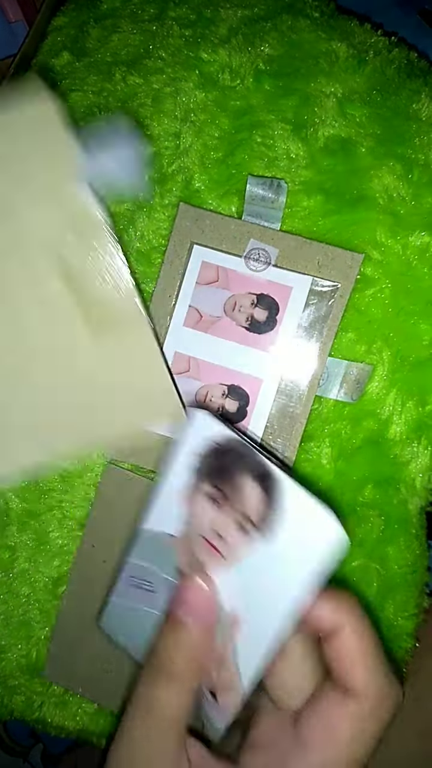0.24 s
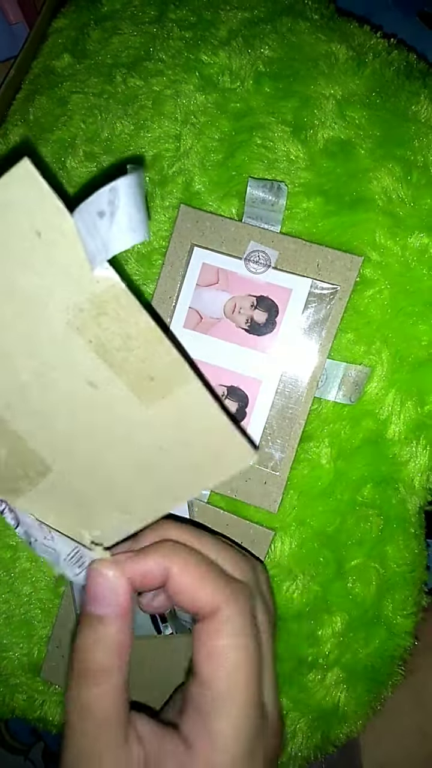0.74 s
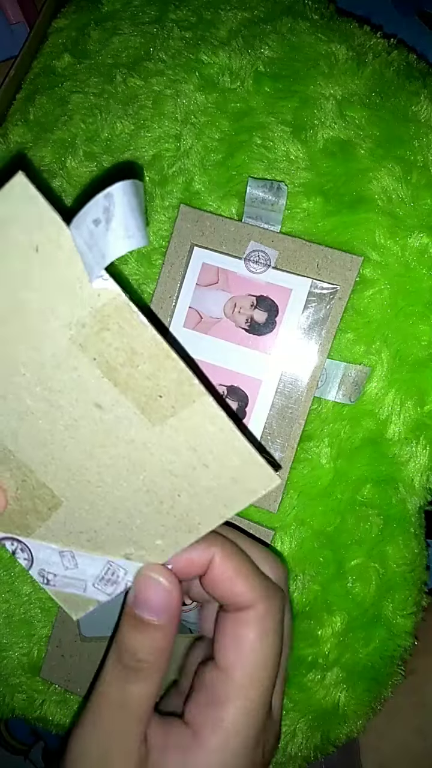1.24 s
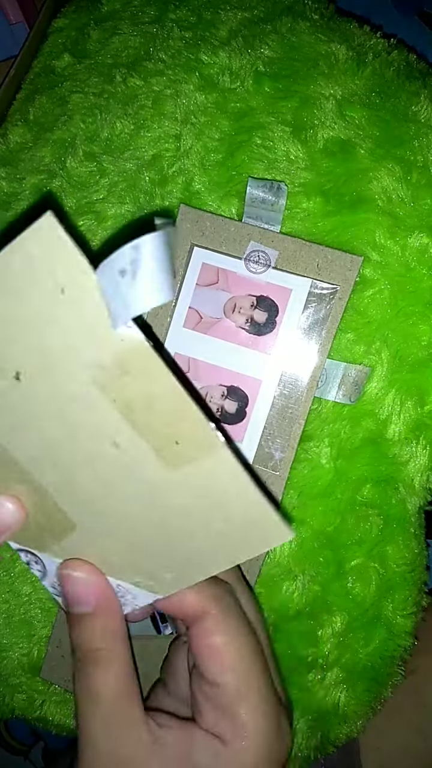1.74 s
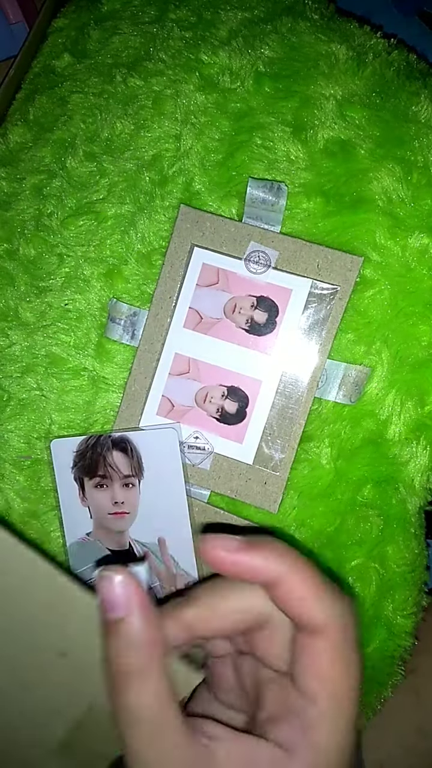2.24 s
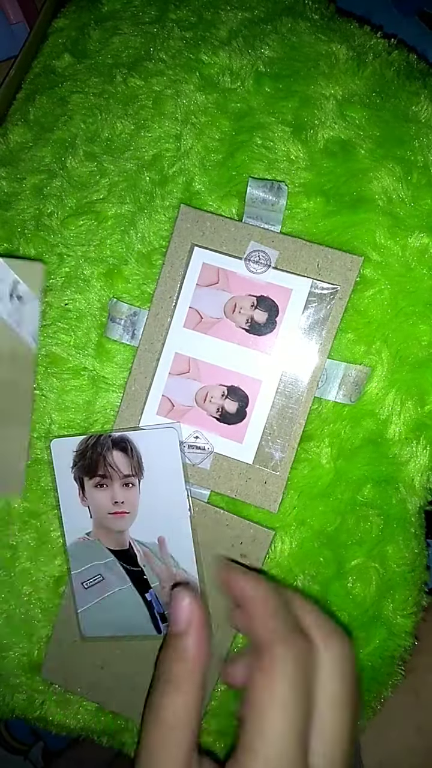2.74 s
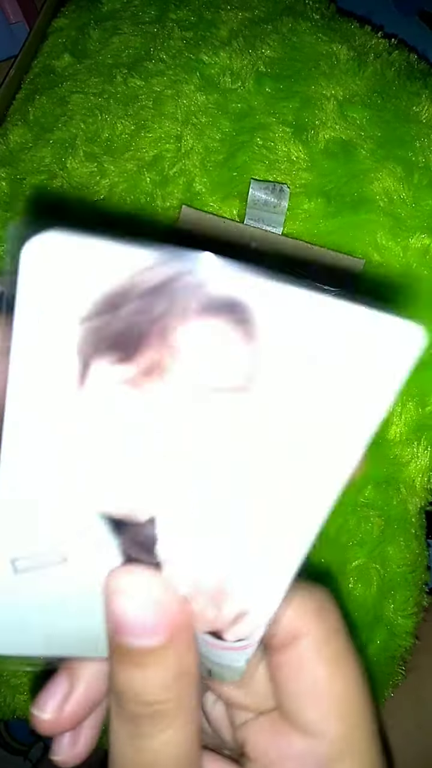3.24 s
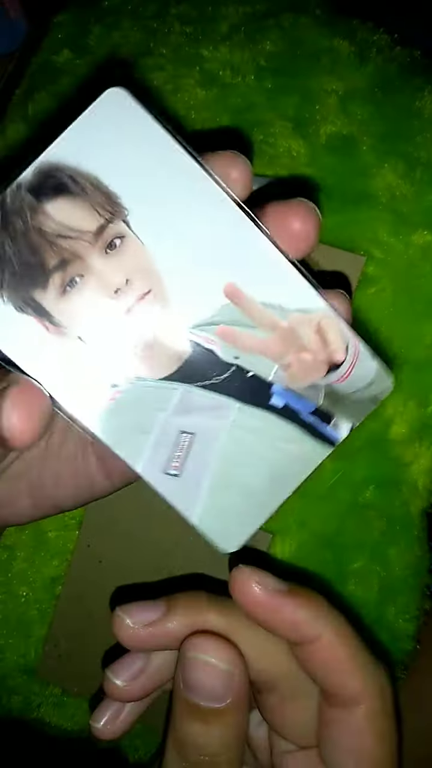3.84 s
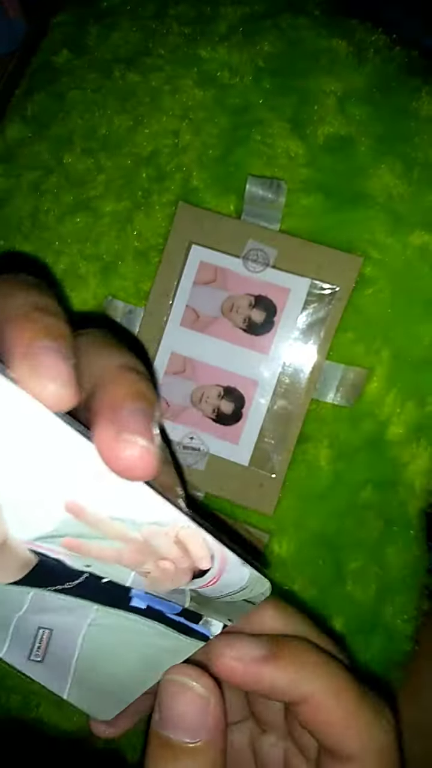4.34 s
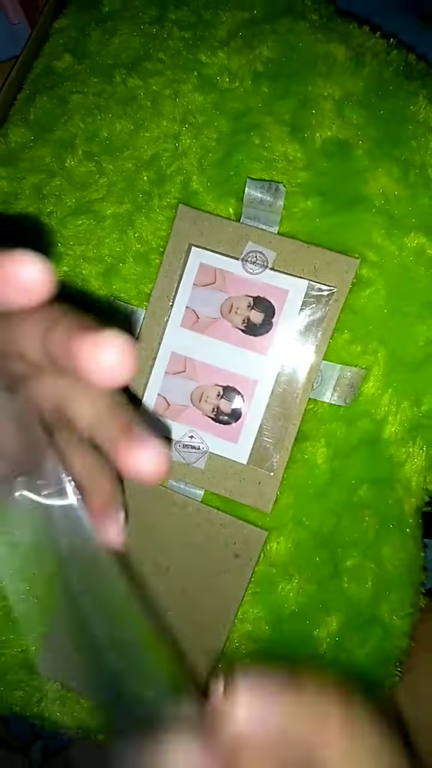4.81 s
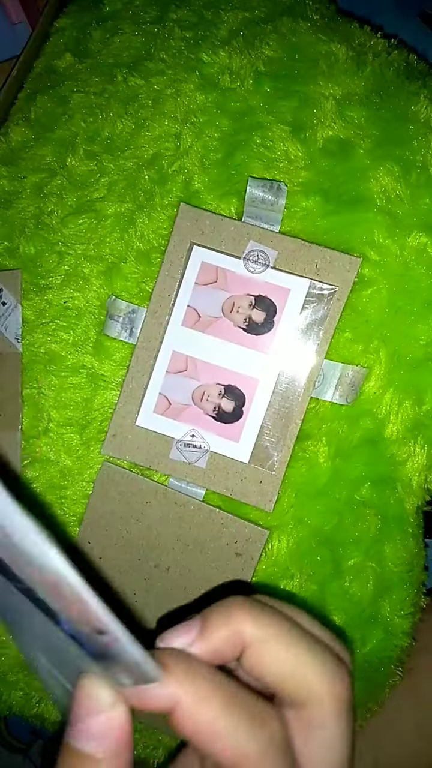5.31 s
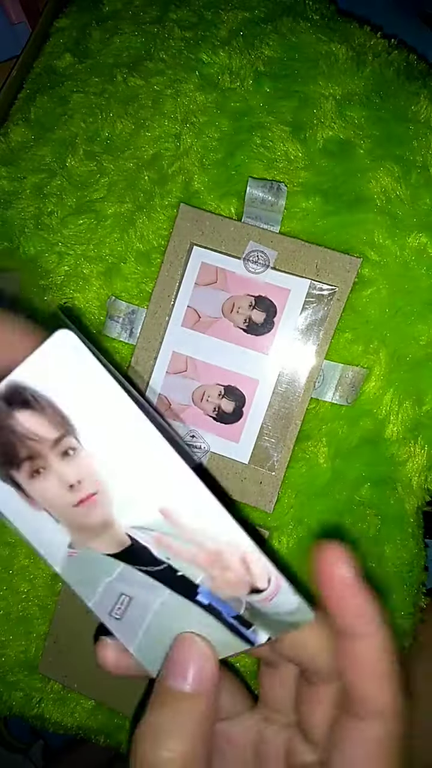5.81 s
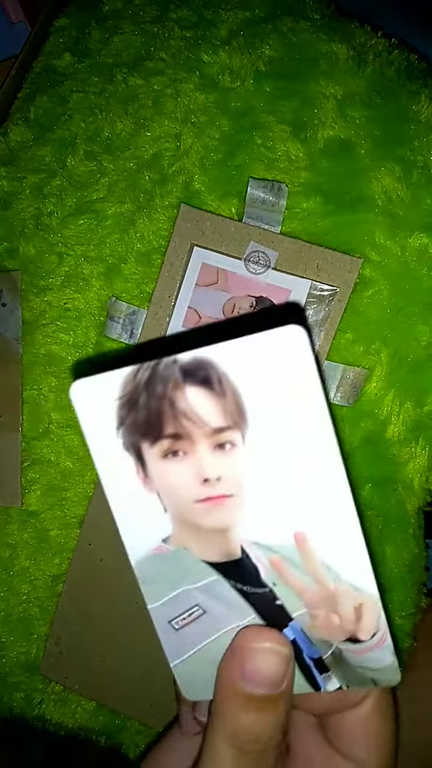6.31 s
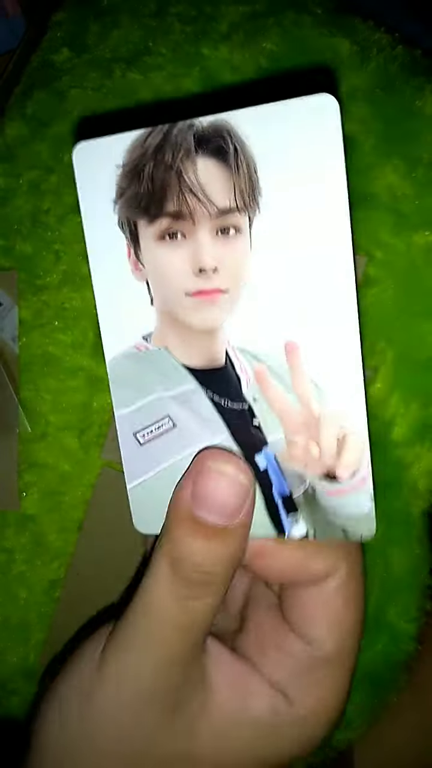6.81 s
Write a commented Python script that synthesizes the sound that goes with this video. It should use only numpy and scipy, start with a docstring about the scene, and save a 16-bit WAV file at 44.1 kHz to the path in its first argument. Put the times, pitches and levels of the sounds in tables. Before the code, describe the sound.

Sticky tape lets go of cardboard in faint crackles and sharp bright snaps, a stiff card is handled, and a low hum throbs in a quiet room.

```python
"""Hands peel sticky tape off cardboard and handle a card in a film sleeve, close to two microphone ports.
The sharpest snap comes about a tenth of a second in, as a low hum begins to throb in a quiet room.
Then glue lets go in bursts of tiny random slips, with smaller snaps, scuffs of the board and dull taps.
Near the end, a tight cluster of strong snaps comes at 6.75 s. Slips are filtered random ticks and hiss;
snaps and taps are fading tones, snaps with added noise; the hum is a wandering tone with rough noise."""
import sys
import numpy as np
from scipy import signal
from scipy.fft import rfft, irfft
from scipy.io import wavfile
from scipy.ndimage import uniform_filter1d

SR = 44100
rng = np.random.default_rng(int(sys.argv[2]) if len(sys.argv) > 2 else 0)


def unload_wav(signal):
    """Save mono or channel-first audio to the path in sys.argv[1] as 16-bit WAV at rate SR, clipped to [-1, 1]."""
    wavfile.write(
        sys.argv[1],
        SR,
        np.round(np.clip(np.atleast_2d(signal).T, -1, 1) * 32767).astype(np.int16),
    )


N = 311346

# Bursts of slips. Each row: centre in seconds, film level in dB, length in ms,
# tape level in dB over film, card level in dB over film.
BURSTS = [(.015, -70, 26, 28, -16), (0.077, -53, 37, 12.5, -28), (.104, -49, 8.3, 15.5, -6),
          (0.1111, -29, 3, 16, 0.5), (0.297, -64, 15.6, 6.5, -23), (.361, -58.5, 20, -3, -2),
          (0.407, -50.5, 28.6, -5, -5), (.53, -75.5, 52, -22, 1.5), (.15, -62.5, 31, 5.5, -13),
          (0.665, -60.5, 16.4, 5, -20.5), (0.865, -61.5, 40, -7, -5), (1.297, -70.5, 16, 4, -13.5),
          (1.3182, -53, 3.8, 2, -22), (1.33, -56, 19, 4, -15), (1.345, -54, 11, 5, -3.5),
          (1.359, -56.5, 14, 3.5, -4), (1.384, -56.5, 23, -3, -13.5), (1.585, -85, 19, -7, 5.5),
          (1.729, -52, 29, 4.5, -8), (1.81, -48.5, 15.7, -3, -15), (1.994, -48, 12, 4, -21),
          (2.038, -57, 71, 1, -12), (2.075, -57.5, 25.5, 15, -22), (2.25, -70, 34, 16, -7),
          (2.34, -46.5, 15, -6, -18), (2.385, -70.5, 51, -6, -6.5), (2.502, -56.5, 21.7, 5, -13),
          (2.67, -70, 36, -1, 1), (2.759, -77.5, 87, -4, -5), (2.937, -66.5, 20, -6, -19),
          (2.973, -56, 13.7, 3, -6), (2.992, -41.5, 11, -1, -10), (3.003, -42, 12, 1, -10),
          (3.016, -44, 14, 4, -1.5), (3.04, -64, 12, 2, -12), (3.055, -57, 7.6, 8, -34),
          (3.1, -78, 41, 25.5, -27), (3.159, -52.5, 32, 9.5, -39), (3.221, -74, 11.6, 24.5, -3.5),
          (3.281, -71.5, 21, 11, -7.5), (3.388, -72, 23, 19, -11), (3.451, -74, 33, 13.5, -24),
          (3.483, -69.5, 9.9, 13.5, -13), (3.544, -68, 21.6, -17, -6.5), (3.888, -60.5, 49, -27, -15.5),
          (4.003, -66.5, 19, -24.5, -21), (4.17, -64.5, 31, -1.5, -11), (4.341, -70, 27, -8, -4.5),
          (4.43, -67, 19, -27, -7.5), (4.495, -81, 7.8, -13, 10), (4.529, -52.5, 12, -4, 1),
          (4.544, -55.5, 18, -3, -10), (4.6, -71, 80, -12.5, -2), (4.684, -73, 15, -26, 8),
          (4.751, -60.5, 23, -1, -11.5), (4.796, -43.5, 24.3, -2, -16), (4.846, -52, 30, 0, -2.5),
          (4.873, -53, 31, 6, -11.5), (4.939, -62, 20.6, -19, -4.5), (5.09, -62, 40, -18, -5),
          (5.169, -52.5, 22.6, -2, -6.5), (5.219, -62, 6, 0, -20), (5.242, -53.5, 17.8, 1, -8),
          (5.286, -78, 27, 23, -22), (5.361, -58, 26.5, -1.5, -9), (5.48, -59, 13.3, -7, -14),
          (5.529, -56, 3.5, -4, 5), (5.543, -42.5, 12.2, -3, -7.5), (5.554, -45, 16, 7, -21),
          (5.587, -61.5, 22, 17, -36), (5.676, -60.5, 26, 5, -15.5), (5.752, -59.5, 56, 3.5, -7),
          (5.781, -40, 11.2, 0.5, -9), (5.824, -59.5, 14.4, 4, -3.5), (5.942, -52.5, 4.8, 3, -1),
          (5.965, -60, 29, -2, -13), (5.988, -57, 6.4, 12, -15), (6.016, -52.5, 35, 10, -22),
          (6.057, -53, 23, -1, -11.5), (6.115, -68, 22, -2, -20), (6.081, -40.5, 11, -1, -4.5),
          (6.289, -63, 17.7, 2.5, -2.5), (6.362, -82, 22, 14.5, -6), (6.737, -57, 12, -1, -14),
          (6.7522, -32.5, 2.5, 3, -12), (6.756, -47, 9.9, -4, -1.5), (6.785, -68.5, 37, 1.5, -3)]
# A finger scuffs the bare board. Each row: centre in seconds, board level in dB, length in ms.
SCUFFS = [(.285, -65, 5.8), (.298, -58.5, 13.3), (.361, -67, 14), (.352, -67, 3.7), (0.409, -51.5, 12.2),
          (0.92, -59.5, 12.2), (1.347, -65, 24), (2.342, -67.5, 12.4), (2.853, -71, 9.6), (2.917, -70, 4.5),
          (2.928, -66, 8), (3.346, -70, 15), (4.496, -67.5, 8.5), (4.661, -70, 41), (4.927, -65.5, 43),
          (5.039, -74, 39), (5.17, -74.5, 89), (5.556, -57, 8.3), (5.784, -54.5, 17), (6.088, -59.5, 7),
          (6.599, -82, 18)]
# Where the hands are. Each row: time in seconds, left over right in dB.
HANDS_PAN = [(0, 2.5), (.3, 0), (.6, -1), (1.3, 3), (2.5, 1), (3.15, 1.5), (3.42, 2.5), (3.5, -6.5),
             (4.2, -7), (4.35, 2.5), (4.8, 1.5), (5.1, -5), (5.35, 1), (5.7, 3.5), (5.8, 0), (6.4, -0.5),
             (6.75, -6)]
# Single sharp releases. Each row: start in seconds, level in dB, ring pitch in Hz, card level in dB over the ring.
SNAPS = [(.0949, -29, 10000, -30), (.1107, -15, 12800, -22), (.1123, -4, 9800, -19),
         (.3975, -38, 8200, -12), (2.3415, -27, 11900, -14), (2.9925, -32, 10500, -18),
         (3.0135, -41, 3100, -10), (3.1767, -35, 10300, -30), (3.2195, -54, 6100, -14),
         (3.2845, -50, 9000, -14), (3.486, -49, 10500, -22), (4.4936, -44, 3600, -16),
         (4.7931, -34, 9000, -28), (5.4805, -46, 9000, -10), (5.5273, -40, 9000, -10),
         (5.659, -54, 11000, -16), (5.781, -32, 9600, -18), (5.9335, -45, 9400, -12),
         (5.9421, -39, 9400, -14), (6.7522, -22, 8300, -22), (6.7541, -15, 8000, -12),
         (6.7545, -15, 10600, -14), (6.755, -18, 11500, -14)]
# Ringing tones of the card. Each row: pitch in Hz, level in dB, time to die by 60 dB in seconds.
CARD_MODES = [(1550, -1.5, 0.0052), (2650, -10.5, 0.0051), (3320, -4, .007), (4260, 1, 0.0032),
              (5486, -14.5, 0.0022)]
# Dull taps of a finger or card edge on the board. Each row: start in seconds, level in dB, pitch in Hz.
KNOCKS = [(0.179, -47, 398), (2.846, -47.5, 375), (2.867, -58, 354), (3.029, -47.5, 187), (5.824, -48, 327),
          (6.087, -55, 320), (6.7655, -48, 704)]
# Colours of film, tape, card, board and room air. Each row: frequency in Hz, relative level in dB per Hz.
FILM_COLOUR = [(3500, -47.5), (5500, -6), (7500, -1.5), (10000, -2.5), (13000, -16.5)]
TAPE_COLOUR = [(8000, -30), (11000, -0.5), (13000, -3), (16000, -1)]
CARD_COLOUR = [(1100, -27.5), (1700, -8.5), (3200, -0.5), (5200, 0), (7500, -23)]
BOARD_COLOUR = [(150, -22.5), (350, 4), (700, -3.5), (1500, -2), (3200, -22), (6000, -39)]
AIR_COLOUR = [(20, -27.5), (50, -2.5), (130, -22), (285, -22), (600, -32), (1900, -42.5), (12400, -47),
              (13200, -67.5), (16000, -64.5)]
# How alike the two ports hear. Each row: frequency in Hz, left-right likeness (1 is the same).
PORT_LIKENESS = [(60, 0.99), (200, 0.88), (640, 0.61), (1400, 0.31), (6800, 0.013)]
# How long the room rings. Each row: frequency in Hz, time to die by 60 dB in seconds.
ROOM_DECAY = [(500, 0.14), (3000, 0.13), (9000, .13), (15000, 0.073)]
# The wandering pitch of the hum. Each row: time in seconds, pitch in Hz.
HUM_PITCH = [(0, 56), (.7, 53), (2, 56), (3, 61), (3.5, 62), (4.6, 59), (5.4, 57), (7.06, 55)]
# Runs of evenly spaced throbs. Each row: first throb in seconds, last throb in seconds, spacing in ms (about),
# first level in dB, middle level in dB, last level in dB, throb length in ms.
THROB_RUNS = [(0.093, 0.362, 91, -50, -49, -41.5, 42.6), (0.454, 0.797, 86, -41.5, -40.5, -41.5, 49),
              (0.881, 0.99, 94, -54.5, -57, -55.5, 76), (1.906, 2.213, 150, -50.5, -46, -46.5, 37),
              (2.295, 2.552, 142, -51, -45.5, -45.5, 66), (2.766, 2.827, 62, -49.5, -52.5, -53, 18),
              (3.031, 3.098, 64, -52.5, -53, -53.5, 27.5), (3.2, 3.894, 70, -52.5, -44.5, -43.5, 33),
              (3.977, 4.237, 87, -54.5, -63, -59, 57), (4.352, 4.555, 66, -47.5, -45, -42, 38.5),
              (4.626, 4.768, 70, -43.5, -40.5, -46.5, 40.6), (4.827, 5.268, 62.5, -53.5, -48, -55.5, 32.7),
              (5.336, 5.484, 133, -59, -54, -61.5, 104), (5.634, 5.721, 75, -49.5, -50, -51.5, 72),
              (5.92, 6.054, 110, -63, -59, -59.5, 107), (6.169, 6.248, 74, -46, -49.5, -43, 40),
              (6.344, 6.647, 59, -48.5, -53.5, -40.5, 37.7), (6.736, 7.035, 100, -49, -62, -54, 58)]

RUSTLE_DB = -92.5  # film level between the bursts: fingers never quite rest
RISE_SHARE = 0.77  # a burst rises faster than it fades
BOARD_UNDER_CARD_DB = -17  # in a burst the board follows the card
SCUFF_CARD_DB = -15  # in a scuff the card sounds along, dB over board
ROOM_DB, AIR_DB = -15.5, -70
EDGE_HZ = 15800


def gain_of(db):
    """Turns decibels into a plain multiplier."""
    return 10 ** (np.asarray(db) / 20)


def evened(x):
    """Scales a signal to an average strength (RMS) of one."""
    return x / np.sqrt(np.mean(x ** 2) + 1e-20)


def read(points, hz):
    """Reads a curve between its points, on a pitch-like scale of frequency."""
    f, value = np.transpose(points)
    return np.interp(np.log(hz + 1), np.log(f + 1), value)


def coloured(x, points):
    """Filters every channel by a spectrum and evens the level."""
    hz = np.fft.rfftfreq(x.shape[-1], 1 / SR)
    spectrum = rfft(x) * gain_of(read(points, hz))
    return evened(irfft(spectrum, x.shape[-1]))


def at_ports(x):
    """Makes two unrelated channels alike where the wavelength is long against the port spacing."""
    left, other = rfft(x)
    same = np.clip(read(PORT_LIKENESS, np.fft.rfftfreq(N, 1 / SR)), -1, 1)
    right = same * left + np.sqrt(1 - same ** 2) * other
    return irfft(np.array([left, right]), N)


def sides(pan_db):
    """Gives the left and right gains; a positive pan is louder on the left."""
    return gain_of(np.multiply.outer([.5, -.5], pan_db))


def near_to(s):
    """Picks the samples within a quarter second of a moment."""
    return slice(max(round((s - .25) * SR), 0), round((s + .25) * SR))


def peeling():
    """Each burst swells and fades and drives film, tape, card and board by its own shares."""
    t = np.arange(N) / SR
    # Rows of power: film, tape, card, board
    power = gain_of(RUSTLE_DB + np.array([0, -12.0, -13.5, -7.0]))[:, None] ** 2 * np.ones(N)
    rows = []
    for s, db, length_ms, tape, card in BURSTS:
        rows.append((s, length_ms, [db, db + tape, db + card, db + card + BOARD_UNDER_CARD_DB]))
    for s, db, length_ms in SCUFFS:
        rows.append((s, length_ms, [-np.inf, -np.inf, db + SCUFF_CARD_DB, db]))
    for s, length_ms, levels_db in rows:
        near = near_to(s)
        lengths = 1000 * (t[near] - s) / max(length_ms, .3)
        rise, fade = abs(lengths / RISE_SHARE) ** 1.8, abs(lengths) ** 1.3
        shape_db = -9.28 * np.where(lengths < 0, rise, fade)
        power[:, near] += gain_of(np.add.outer(levels_db, shape_db)) ** 2
    thin = slips(per_s=4000., spread_db=1.8, hiss=0.37)
    thick = slips(per_s=2500., spread_db=1.2, hiss=0.49)
    drives = [(thin, FILM_COLOUR), (thin, TAPE_COLOUR), (thick, CARD_COLOUR), (thick, BOARD_COLOUR)]
    sound = sum(np.sqrt(p) * coloured(*drive) for p, drive in zip(power, drives))
    return sound * sides(np.interp(t, *np.transpose(HANDS_PAN)))


def slips(per_s, spread_db, hiss):
    """Glue threads break at random, a few much louder; the bending sheet shifts their colour in patches."""
    happens = rng.random(N) < per_s / SR
    size = happens * gain_of(spread_db * np.minimum(rng.exponential(1, N), 5))
    clumps = evened(uniform_filter1d(rng.standard_normal(N), size=250))
    size = size * gain_of(2.0 * clumps) * rng.choice([-1., 1.], N)  # slips come in clumps, either way up
    # Each of 12 spots reaches each port by its own reflections
    spot = rng.integers(0, 12, size=N)
    smears = irfft(np.exp(2j * np.pi * rng.random((12, 2, 25))))
    ticks = sum(signal.oaconvolve((size * (spot == k))[None], smear, axes=1) for k, smear in enumerate(smears))
    rough = evened(ticks[:, :N]) + hiss * rng.standard_normal((2, N))
    z = signal.stft(rough, nperseg=256, noverlap=192)[2]
    # Random patches, smoothed over frequency and then time, the same at both ports
    patches = uniform_filter1d(rng.standard_normal(z.shape[:0:-1]).T, size=5, axis=0)
    patches = evened(uniform_filter1d(patches, size=12, axis=1))
    bent = z * gain_of(3.4 * patches)
    return at_ports(signal.istft(bent, nperseg=256, noverlap=192)[1][:, :N])


def snaps():
    """A click rings the film for a few cycles; fizz and the modes of the card die just after it."""
    out, t = np.zeros((2, N + 400)), np.arange(-12, 388) / SR
    chance = rng.standard_normal((len(SNAPS), 2, 401))
    after = np.maximum(t, 0)
    start = np.exp(np.minimum(t, 0) / .0001)
    for (s, db, hz, card_db), draw in zip(SNAPS, chance):
        ring = np.cos(2 * np.pi * hz * t + 2 * draw[:, :1]) * np.exp(-after * hz / 2.3)
        ring = ring * sides(-4.0)[:, None]
        fizz = coloured(draw[::-1, 1:], FILM_COLOUR[:-1] + TAPE_COLOUR[2:]) * np.exp(-after / .0008)
        crack = 0
        for k, (mode_hz, mode_db, t60) in enumerate(CARD_MODES):
            mode = np.cos(2 * np.pi * mode_hz * t + 2 * draw[:, k, None])
            crack = crack + gain_of(mode_db - 60 * after / t60) * mode
        # Long waves reach both ports much alike, so the thud shares a part
        thud = coloured(draw[0, 1:] + .5 * draw[:, :0:-1], BOARD_COLOUR) * np.exp(-after / 0.00066)
        snap = ring + .3 * fizz + gain_of(card_db) * (crack + .3 * thud)
        out[:, round(s * SR) - 12:][:, :400] += gain_of(db) * start * snap
    return signal.lfilter(*signal.butter(2, 500, "high", fs=SR), out[:, :N])  # small sheets radiate little bass


def knocks():
    """A soft tick rings the board briefly while it gives way for a cycle."""
    out, t = np.zeros(N + 2000), np.arange(2000) / SR
    for s, db, hz in KNOCKS:
        tick = sum(np.sin(2 * np.pi * f * t) * np.exp(-t * f / 0.47) for f in (900., 1900.))
        tick = tick * (1 - np.exp(-t / .00015))
        give = np.sin(2 * np.pi * hz * t) * np.exp(-t * hz / 0.46)
        out[round(s * SR):][:2000] -= gain_of(db) * (give + 0.71 * tick)
    return out[:N] * sides(0.51)[:, None]


def room(x):
    """A short diffuse tail, each band dying at its own speed."""
    hz, t, z = signal.stft(rng.standard_normal((2, SR // 3)), SR, nperseg=128)
    dying = z * gain_of(-60 * t / read(ROOM_DECAY, hz)[:, None])
    tail = signal.istft(dying, SR, nperseg=128)[1]
    tail = np.pad(tail, ((0, 0), (90, 0)))  # it starts about 2 ms late
    return signal.fftconvolve(x, tail / np.linalg.norm(tail[0]), axes=1)[:, :N]


def hum():
    """A low tone whose pitch wanders swells throb by throb, with a rough skirt of noise around it."""
    t = np.arange(N) / SR
    cycles = np.cumsum(np.interp(t, *np.transpose(HUM_PITCH))) / SR
    tone = np.sqrt(2) * np.sin(2 * np.pi * (cycles + rng.random()))
    skirt_colour = [(20, -9), (45, 9.0), (90, -2.0), (190, -11), (260, -47.5)]  # Hz, dB per Hz
    skirt = coloured(at_ports(rng.standard_normal((2, N))), skirt_colour)
    # The flank is opposite at the two ports
    flank = coloured(rng.standard_normal(N), [(25, -11), (55, 17.5), (100, -33.0)])
    return throbs() * (tone * sides(0.49)[:, None] + 0.28 * skirt + np.outer([.1, -.1], flank))


def throbs():
    """Evenly spaced swells whose level bends from first over middle to last of each run."""
    t, swell = np.arange(N) / SR, np.zeros(N)
    for first, last, spacing_ms, first_db, middle_db, last_db, length_ms in THROB_RUNS:
        count = round(1000 * (last - first) / spacing_ms) + 1
        for u in np.linspace(-1, 1, count):  # place in the run
            s = first + (last - first) * (u + 1) / 2
            db = middle_db * (1 - u ** 2) + first_db * u * (u - 1) / 2 + last_db * u * (u + 1) / 2
            near = near_to(s)
            lengths = 1000 * (t[near] - s) / length_ms
            swell[near] += gain_of(db - 24.0 * lengths ** 2)
    return swell


def air():
    """The steady floor of the room is coloured noise, wavering a little."""
    waver = evened(uniform_filter1d(rng.standard_normal(N), size=3000))
    noise = coloured(at_ports(rng.standard_normal((2, N))), AIR_COLOUR)
    return gain_of(AIR_DB + 1.1 * waver) * noise


def scene():
    """The hands' sounds, their room tail, the hum and the air add up."""
    hands = peeling() + snaps() + knocks()
    return hands + gain_of(ROOM_DB) * room(hands) + hum() + air()


def record(dry):
    """The band limit of the recorder takes away the highest treble."""
    low_pass = signal.firwin(511, EDGE_HZ, window=("kaiser", 9), fs=SR)
    return signal.oaconvolve(dry, low_pass[None], "same")


dry = scene()
out = record(dry)
unload_wav(out)
```